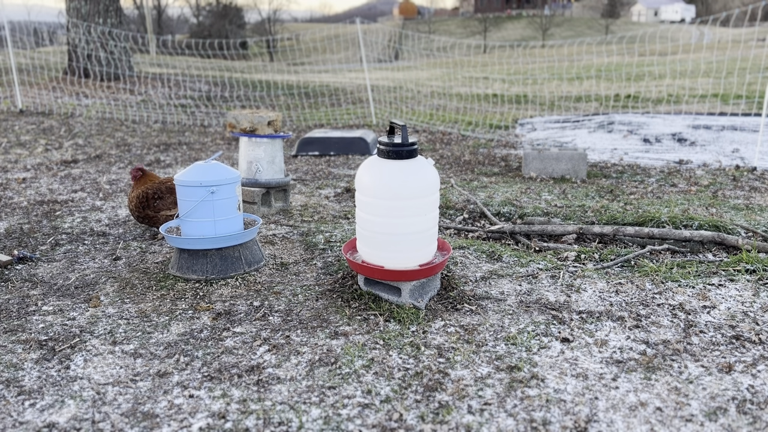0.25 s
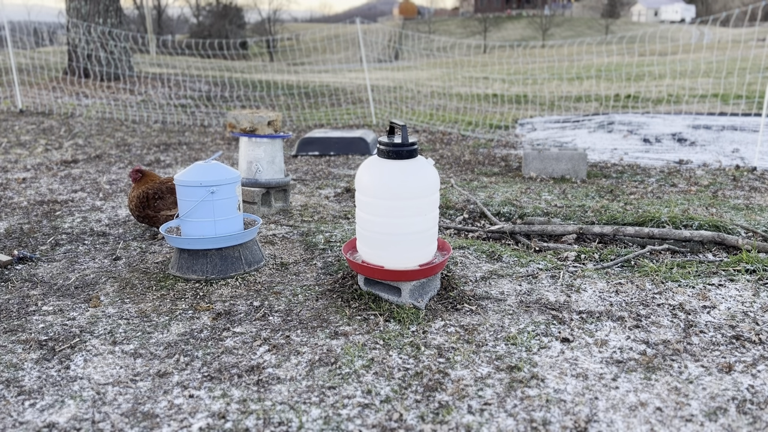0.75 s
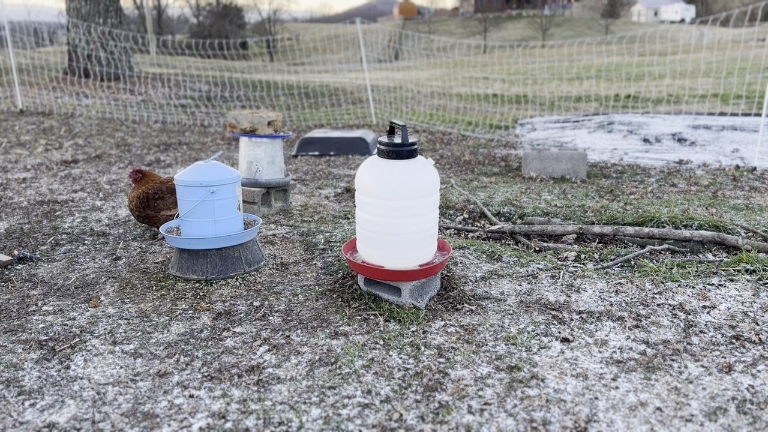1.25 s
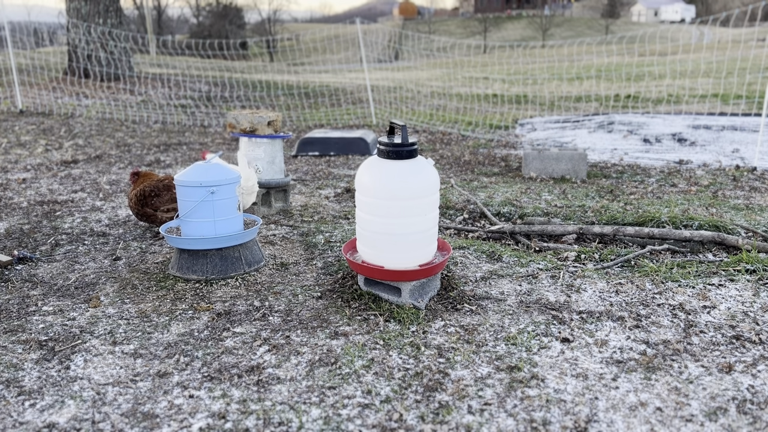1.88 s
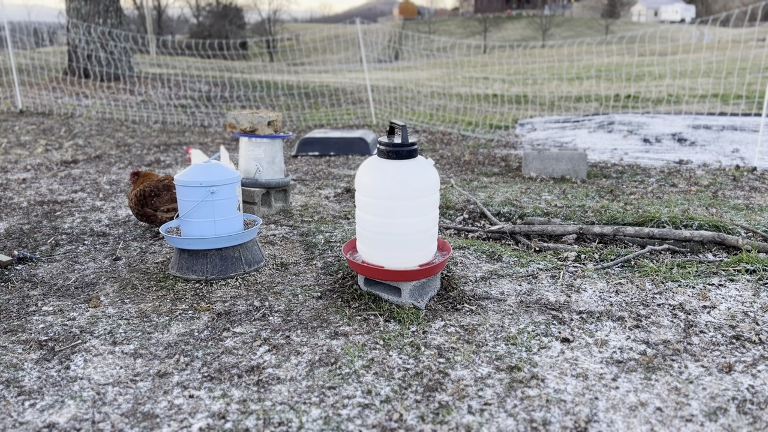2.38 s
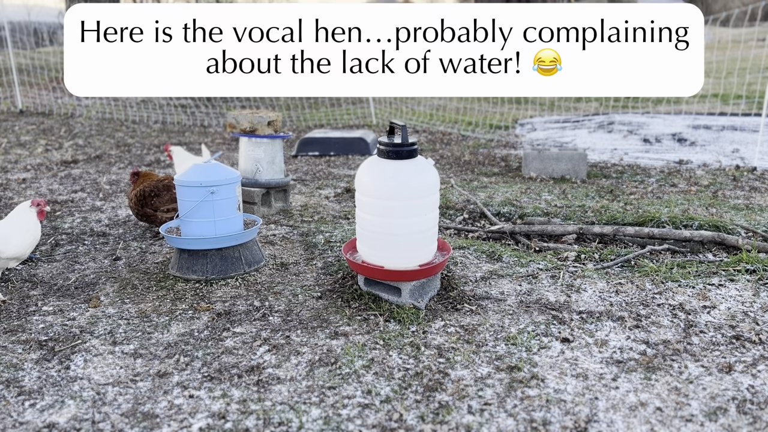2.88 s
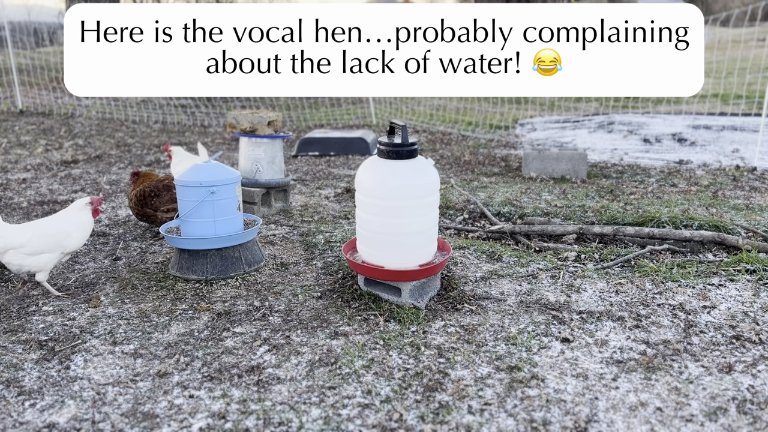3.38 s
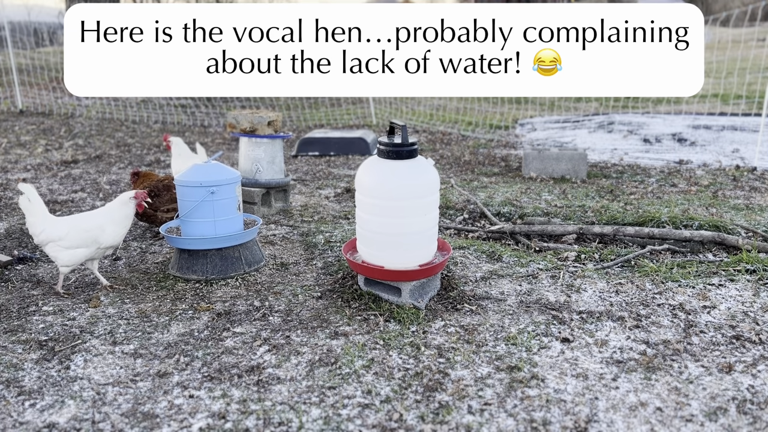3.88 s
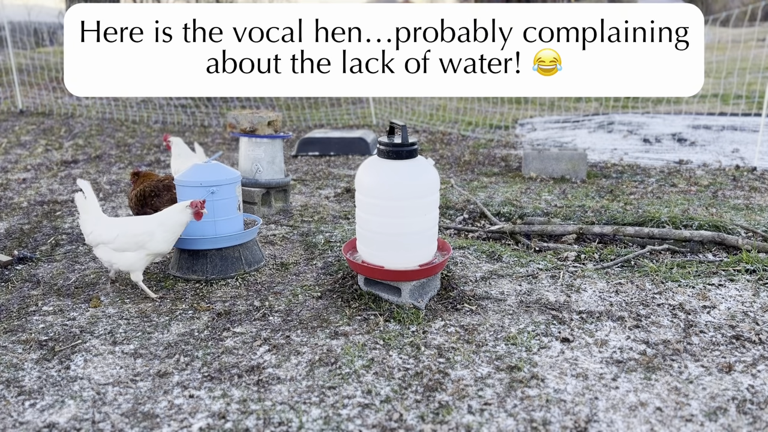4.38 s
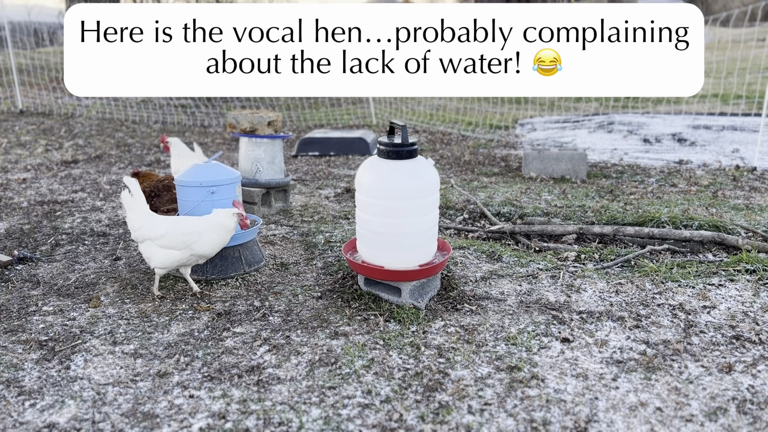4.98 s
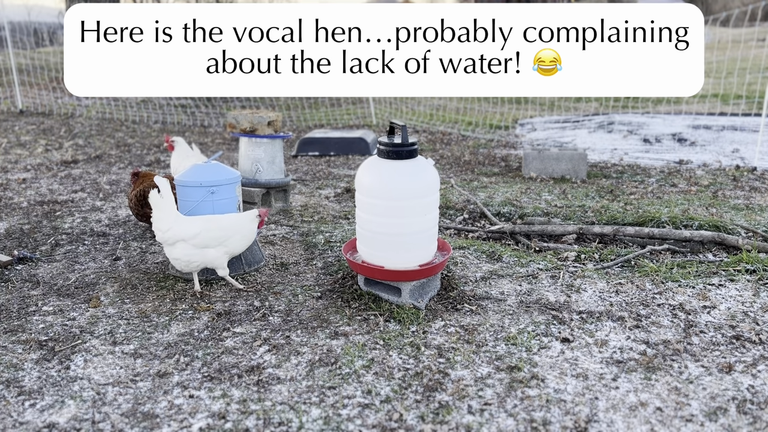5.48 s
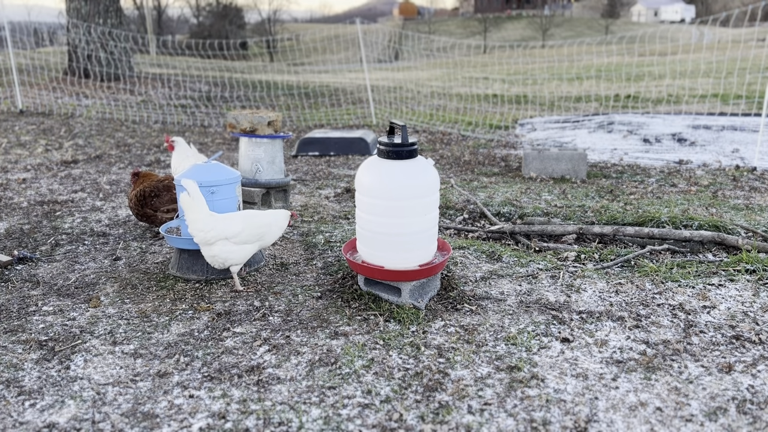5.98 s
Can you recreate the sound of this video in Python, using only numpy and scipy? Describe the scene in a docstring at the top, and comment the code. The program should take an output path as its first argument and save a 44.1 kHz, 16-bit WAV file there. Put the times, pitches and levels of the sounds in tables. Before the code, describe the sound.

In a quiet outdoor run, a hen's closed-beak moan leads to two raspy drawn-out squawks, then small ticks and a burst of rattling hollow thumps.

```python
"""Hen walking through an outdoor run

A hen walks in from the left: a closed-beak moan, then two long hoarse calls that flip between clear and
ragged pulse trains in moving throat resonances, with soft clucks of a few partials between. Small ticks are
noise puffs over thuds; a hollow body off to the left booms, snaps and rattles when knocked. Far rumble and
hiss are shaped noise. Two spaced microphone ports hear hen, ticks and knocks earlier on the left."""
import sys
import numpy as np
from scipy import signal
from scipy.fft import rfft, irfft, next_fast_len
from scipy.io import wavfile
from scipy.ndimage import uniform_filter1d, map_coordinates

SR = 44100
rng = np.random.default_rng(int(sys.argv[2]) if len(sys.argv) > 2 else 0)


def wrap_up_sound(samples):
    """Save the sound to the file named by the first command line argument, as 16-bit audio."""
    columns = np.atleast_2d(samples).T
    # keep every value between -1 and 1, then stretch to whole-number steps
    tamed = np.clip(columns, -1, 1)
    steps = np.round(tamed * 32767).astype(np.int16)
    wavfile.write(sys.argv[1], SR, steps)


N = 275184
T = np.arange(N) / SR  # s


def amp(db):
    """dB to gain."""
    return 10 ** (np.asarray(db) / 20)


def unit(x):
    """Scaled to rms 1."""
    return x / np.sqrt(np.mean(x ** 2) + 1e-20)


def along(points, hz):
    """Values of (Hz, value) points, read on a log frequency axis."""
    f, v = np.transpose(points)
    return np.interp(np.log(hz + 1), np.log(f + 1), v)


def wobble(rate):
    """A smooth random curve with rate knots a second."""
    return map_coordinates(rng.standard_normal(int(N * rate / SR) + 4), [T * rate])


def filtered(x, response):
    """x filtered by a response that is a function of frequency in Hz."""
    m = next_fast_len(N + SR // 2)
    return irfft(rfft(x, m) * response(np.fft.rfftfreq(m, 1 / SR)), m)[..., :N]


def from_left(x, lag_ms):
    """The right port hears it later (lag steady or moving) and shaded; the upper treble sits nearer the middle."""
    # left minus right, from the shading by the recorder's body: (f/Hz, level/dB)
    shade = [(200, 0), (380, 1.5), (700, 6.5), (1150, 6), (1600, .5), (2200, .5), (3000, 2.5), (4500, 1),
             (6500, 4), (8500, 0)]
    side = np.array([1, -1])[:, None, None] / 2
    f, t, z = signal.stft(x, SR, nperseg=512)
    f = f[:, None]
    lag_s = np.interp(t, T, lag_ms + 0 * T) / 1000
    centred = .62 / (1 + (5600 / (f + 1)) ** 6)
    delay = np.exp(2j * np.pi * f * side * lag_s)
    ports = amp(side * along(shade, f)) * (centred + (1 - centred) * delay)
    return signal.istft(z * ports, SR, nperseg=512)[1][:, :N]


def yard():
    """Far rumble, shared by both ports in the lows and separate higher up, under an uneven stereo hiss."""
    # rumble level: (t/s, level/dB)
    rumble_level = [(0, -68.5), (3.8, -61.5), (4.8, -65.5), (6.24, -65)]
    # relative rumble and hiss spectra: (f/Hz, level/dB per Hz)
    rumble_colour = [(20, -37), (32, -26), (50, 2), (120, -2.5), (230, -11.5), (400, -15), (700, -33.5),
                     (1000, -49.5)]
    hiss_colour = [(1000, 0.5), (1600, -5.5), (2050, 3), (2800, -6.5), (5000, -10.5), (6400, 5.5),
                   (7300, 0), (8800, -27.5), (14000, -38)]
    # hiss, left minus right: (f/Hz, level/dB)
    hiss_left = [(700, 2), (4400, 6.5), (8000, 28), (11000, -16)]
    shared, own = rng.standard_normal(N), rng.standard_normal((2, N))
    own_share = lambda f: np.clip(f / 450, .1, 1)
    colour = lambda f: amp(along(rumble_colour, f))
    common = filtered(shared, lambda f: colour(f) * np.sqrt(1 - own_share(f) ** 2))
    separate = filtered(own, lambda f: colour(f) * own_share(f))
    level_db = np.interp(T, *np.transpose(rumble_level)) + 1.5 * wobble(7)
    rumble = unit(common + separate) * amp(level_db)
    side = np.array([[0], [-1]])
    hiss = filtered(rng.standard_normal((2, N)),
                    lambda f: amp(along(hiss_colour, f) + side * along(hiss_left, f)))
    return rumble + amp(-78.5) * unit(hiss)


def pulses(hz, size):
    """One band-limited pulse each time the phase passes a whole cycle, as from a beating syrinx."""
    phase = np.cumsum(hz) / SR
    at = np.interp(np.arange(1, int(phase[-1])), phase, np.arange(N))
    taps = at.astype(int)[:, None] + np.arange(-7, 9)
    offset = taps - at[:, None]
    shape = np.sinc(offset) * np.cos(offset * np.pi / 16) ** 2
    weights = shape * size[at.astype(int), None]
    return np.bincount(np.clip(taps, 0, N - 1).ravel(), weights.ravel(), N)


def tube(modes, f, width_hz):
    """Steep resonances, wider in the treble; low ones merge, alternate signs leave valleys between high ones."""
    merge_below_hz = 1950
    peak = lambda c, w: (1j * f * w / (c * c - f * f + 1j * f * w)) ** 2
    peaks = [(c, amp(db) * peak(c, width_hz + .06 * c)) for c, db in modes]
    low = sum(abs(h) for c, h in peaks if c <= merge_below_hz)
    high = [h for c, h in peaks if c > merge_below_hz]
    return low + sum((-1) ** k * h for k, h in enumerate(high))


def call(rows, throats, opens_s, brighten_db, steadiness, flutter_hz, catch_db, width_hz, jitter,
         clump_db, clumps, tilt_hz, tone_db, lag_ms):
    """A steady soft pulse train and a chaotic sharp one trade places in a throat moved by beak and neck.

    Pairs run from beak closed to beak open."""
    # moments when the syrinx settles into a clear tone: (from/s, to/s)
    clear_moments = [(1.0, 1.23), (1.478, 1.505), (1.572, 1.608), (1.624, 1.638), (1.666, 1.704),
                     (1.72, 1.734), (1.756, 1.782), (1.84, 1.97), (3.74, 3.82)]
    clear_share = .93
    attack_s, release_db_per_s, sag_hz_per_s = .004, 748, 400
    opening_s, open_db = .019, 5  # the beak opens late in a long call and the sound gains
    saturation = .4  # exponent; the airflow caps the swing, so bursts even out

    # fast start; past the last row the call dies away and its pitch sags
    s, db, hz, neck = np.transpose(rows)
    after = np.clip(T - s[-1], 0, .08)
    pitch = np.interp(T, s, hz) - sag_hz_per_s * after
    opening = np.clip((T - opens_s) / opening_s, 0, 1)
    level = amp(np.interp(T, s, db) + open_db * opening - release_db_per_s * after)
    level = level * np.clip((T - s[0]) / attack_s, 0, 1)

    # three excitations
    steady = pulses(pitch * (1 + .011 * wobble(45)), amp(1.5 * wobble(60)))
    ragged_size = amp(clump_db * wobble(clumps) + 2.5 * wobble(900))
    ragged = pulses(pitch * np.exp(jitter * wobble(220)), ragged_size)
    breath = unit(rng.standard_normal(N) * amp(clump_db * wobble(clumps)))
    span = slice(int(s[0] * SR), int((s[-1] + .08) * SR))
    sources = np.array([unit(steady), unit(ragged), breath])[:, span]
    f, t, (tone, rasp, air) = signal.stft(sources, SR, nperseg=512, noverlap=448)
    f, t = f[:, None], t + s[0]
    airy = .03 + .5 * f / (f + 3000)
    rasp = np.sqrt(1 - airy) * rasp + np.sqrt(airy) * air  # turbulence gains on the pulses in the treble

    # the neck trembles, so the low resonances waver; the treble follows mostly the slow posture
    beak, stretch = np.interp(t, T, opening), np.interp(t, s, neck)
    treble_db = brighten_db * (stretch - 1) * 100
    posture = uniform_filter1d(stretch, size=120, mode="nearest")
    trembling = stretch * (1 + .03 * np.interp(t, T, wobble(35)))
    stretch = posture + (trembling - posture) / (1 + (f / 2500) ** 2)
    narrow, wide = (tube(modes, f / stretch, width_hz) for modes in throats)
    # random patches of the call's treble swell and fade
    patches = uniform_filter1d(rng.standard_normal(tone.shape), size=7, axis=0)
    patches = unit(uniform_filter1d(patches, size=45))
    treble_gain = amp((treble_db + 5 * patches) * f / (f + 2500))
    throat = ((1 - beak) * narrow + beak * wide) * treble_gain
    soft = throat * ((1 + 1j * f / 2000) / (1 + 1j * f / tilt_hz)) ** 2

    # clear tone against rasp
    settled_now = clear_share * sum((t > a) & (t < b) for a, b in clear_moments)
    least_clear = np.interp(beak, [0, 1], steadiness) * amp(5 * np.interp(t, T, wobble(30)))
    clear = np.clip(settled_now, least_clear, 1)
    settled = clear / (1 + (f / 6000) ** 4)  # the treble stays breathy even in clear moments
    power = lambda h: np.sqrt(np.mean(abs(h) ** 2, axis=0))
    clear_part = amp(tone_db) * np.sqrt(clear) * tone * soft / power(soft)
    ragged_part = np.sqrt(1 - settled) * rasp * throat / power(throat)
    sound = signal.istft(clear_part + ragged_part, SR, nperseg=512, noverlap=448)[1]
    swing = uniform_filter1d(abs(signal.hilbert(sound)), size=130)
    sound = unit(sound / (swing + .2) ** saturation)
    voice = np.zeros(N)
    voice[span] = sound[:span.stop - span.start]

    # the ragged voice flutters: it catches briefly at an uneven beat, to a depth set by the beak
    beat = np.cos(2 * np.pi * np.cumsum(flutter_hz * np.exp(.25 * wobble(40))) / SR)
    depth_db = np.clip(.7 + .4 * wobble(60), 0, 1.3) * np.interp(opening, [0, 1], catch_db)
    caught_db = np.clip(beat, 0, 1) ** 2 * depth_db * (1 - np.interp(T, t, clear))
    return from_left(voice * level * amp(-caught_db), lag_ms)


def hen():
    """She comes nearer the middle, so the lag between the ports shrinks from call to call."""
    # the calls: (t/s, level/dB before the beak opens, pitch f/Hz, stretch of the throat resonances/factor)
    moan_rows = [(0, -54.5, 695.7, 0.896), (.95, -54, 707, 0.924), (1.2, -58.5, 789, 1),
                 (1.42, -59, 795, 1.28)]
    first_rows = [(1.433, -41.5, 405.4, 1.08), (1.58, -44.5, 384.4, 0.93), (1.64, -42, 412, 0.98),
                  (1.69, -44.5, 372.2, 1.2), (1.73, -43, 413.8, 0.8), (1.79, -44, 384, 1),
                  (1.96, -44, 399.2, 1.09), (1.975, -44, 589.6, 1.037), (2.12, -42.5, 520, 0.932),
                  (2.24, -43.5, 610.3, 1.087), (2.29, -45.5, 599.3, 0.98)]
    second_rows = [(2.748, -57, 339.7, 0.84), (2.776, -50, 341.4, 0.84), (2.79, -57.5, 341.5, 0.82),
                   (2.865, -52, 348.3, 0.87), (3.25, -43, 392.1, 0.97), (3.7, -39, 431.8, 1.078),
                   (3.82, -42.5, 473.8, 0.97), (3.84, -39, 546.5, 1), (3.9, -36.5, 521.5, 0.96),
                   (4.02, -39, 514.4, 1.024), (4.08, -34, 554, 0.99), (4.145, -35.5, 487.7, 0.95)]
    # throat resonances in five postures: (f/Hz, level/dB)
    shut = [(450, 5), (700, 18), (1150, -11)]
    low = [(780, 4), (1230, 7), (2030, -3), (2420, -6.5), (3350, -10.5), (4500, -7.5), (8000, -24),
           (9600, -25), (12400, -28), (14500, -33)]
    stretched = [(550, -12), (1200, 5.5), (2250, -20.5), (3200, -12.5), (4700, -9), (6000, -39),
                 (7300, -22.5), (8900, -21), (11900, -27), (14500, -33)]
    parted = [(380, -9), (750, 0), (1280, 10), (1750, -5), (2400, -5.5), (3450, -6.5), (4700, -13),
              (6450, -4), (8100, -19.5), (9700, -31), (13900, -36)]
    wide_open = [(550, -13), (1050, -11.5), (1550, 12), (1850, -14), (2350, -11), (3050, -10.5),
                 (4300, -2.5), (6400, -8), (8600, -21), (14900, -34.5)]
    # lag between the ports as she walks during the last call: (t/s, lag/ms)
    walk = [(2.9, .245), (3.4, .185), (4.1, .175)]
    # brighten_db is treble per percent of stretch
    moan = call(moan_rows, (shut, shut), opens_s=np.inf, brighten_db=0, steadiness=(.12, .12),
                flutter_hz=60, catch_db=(19, 19), width_hz=160, jitter=.13, clump_db=2.5, clumps=45,
                tilt_hz=900, tone_db=0, lag_ms=.48)
    first = call(first_rows, (low, stretched), opens_s=1.955, brighten_db=0, steadiness=(.05, .04),
                 flutter_hz=70, catch_db=(8, 14), width_hz=190, jitter=.14, clump_db=2, clumps=170,
                 tilt_hz=500, tone_db=-2, lag_ms=.29)
    second = call(second_rows, (parted, wide_open), opens_s=3.765, brighten_db=.5, steadiness=(.11, .05),
                  flutter_hz=95, catch_db=(9, 13), width_hz=190, jitter=.13, clump_db=2, clumps=200,
                  tilt_hz=1100, tone_db=-2, lag_ms=np.interp(T, *np.transpose(walk)))
    return moan + first + second


def clucks():
    """Short rounded notes, mostly two partials, a little hoarse from random phase drift."""
    # soft clucks: (t/s, length/s, pitch f/Hz, level/dB, second partial over the first/dB)
    notes = [(0.249, 0.094, 209, -74.5, 12.5), (0.497, 0.11, 220, -83.5, 21),
             (1.247, 0.047, 234, -59, -4.5), (1.369, 0.041, 252, -57, -1), (2.528, 0.05, 271.6, -65, 8),
             (2.641, 0.051, 234.5, -63.5, 2.5), (2.701, 0.048, 230, -61.5, 7),
             (4.462, 0.1, 378.7, -70, 0.5), (5.116, 0.027, 273.9, -63.5, 6),
             (5.843, 0.034, 246.7, -61.5, 9)]
    out = np.zeros(N)
    for s, length, hz, db, second_db in notes:
        t = np.arange(int(length * SR)) / SR
        turn = 2 * np.pi * hz * t + np.cumsum(rng.normal(0, .03, len(t)))
        upper = np.sin(2 * turn) + amp(-17) * np.sin(3 * turn) + amp(-24) * np.sin(4 * turn)
        note = np.sin(turn) + amp(second_db) * upper
        swell = np.sin(np.pi * (t / length) ** .53)
        out[round(s * SR):][:len(t)] += amp(db) * note * swell
    return from_left(out, lag_ms=.29)


def ticks():
    """Small pecks and footfalls: a bright puff over a short thud; soft rustles of much the same colour."""
    # ticks: (t/s, level/dB, t60/s held within .01 to .3, thud over the tick/dB, lowest resonance f/Hz)
    pecks = [(0.681, -69.5, 0.14, 2, 2180), (1.44, -57, 0.23, -4, 2020), (2.71, -64, 0.0059, 25, 2100),
             (4.913, -64, 0.35, -4, 2070), (5.149, -54, 0.058, 5.5, 2930)]
    # faint soft rustles: (middle t/s, half length/s, level/dB)
    rustle_rows = [(4.404, 0.21, -74)]
    out, t, noise = np.zeros(N + SR), np.arange(SR // 4) / SR, rng.standard_normal(N)

    def grit(hz):
        """Noise through three resonances, the lowest one given."""
        modes = [(hz, 0), (2.05 * hz, -6), (3.4 * hz, -15)]
        return unit(filtered(noise, lambda f: tube(modes, f, width_hz=1100)))

    for s, db, t60, thud_db, hz in pecks:
        i = round(s * SR)
        thud = amp(thud_db - 60 * t / .016) * np.sin(2 * np.pi * 170 * t)
        puff = grit(hz)[i:][:len(t)] * amp(-60 * t / np.clip(t60, .01, .3))
        out[i:][:len(t)] += amp(db) * (puff + thud)
    rustle_level = sum(amp(db) * np.exp(-((T - s) / half) ** 2) for s, half, db in rustle_rows)
    return from_left(out[:N] + grit(1840) * rustle_level, lag_ms=.46)


def knocks():
    """Each blow booms in a hollow body, snaps in the treble and sets loose parts rattling."""
    # blows on the hollow body: (t/s, boom level/dB, rattle t60/s)
    blows = [(5.286, -38.5, 1), (5.359, -36, 0.47), (5.449, -45, 0.55), (5.551, -51, 0.25),
             (5.89, -38, 0.38)]
    # resonances of the body, before a random spread per blow: (f/Hz, level/dB, t60/s)
    hollow = [(75.2, -5, 0.35), (174, 4, 0.16), (194.7, 0.5, 0.24), (236.6, -16.5, 0.6), (370.3, -13, 0.3)]
    # colour of the rattle: (f/Hz, level/dB)
    rattle_colour = [(300, -0.5), (600, -1.5), (900, -13), (1400, 0.5), (2100, -5), (3000, -11),
                     (4500, -15.5), (11000, -23), (16000, -48)]
    boom_late_s = .00687  # the body takes a moment to swing up
    rattle_db, crack_db = -13, -22  # against the boom
    crack_lasts, crack_hz = .26, 11500  # snap's decay as a share of the rattle's; its low cut
    boom, loose, snap = np.zeros(N + SR), np.zeros(N + SR), np.zeros(N + SR)
    t = np.arange(SR // 2) / SR
    for s, db, t60 in blows:
        i = round(s * SR)
        spread_db = rng.normal(0, 2.4, len(hollow))
        ring = sum(amp(level + d - 60 * t / decay) * np.sin(2 * np.pi * hz * t)
                   for d, (hz, level, decay) in zip(spread_db, hollow))
        boom[round((s + boom_late_s) * SR):][:len(t)] += amp(db) * ring * (1 - np.exp(-t / .0062))
        rattling = amp(-60 * t / t60) * (1 - np.exp(-t / .0052))
        first_hit = 3.1 * amp(-60 * t / .012)
        loose[i:][:len(t)] += amp(db + rattle_db) * (rattling + first_hit)
        snap[i:][:len(t)] += amp(db + crack_db - 60 * t / (crack_lasts * t60))
    uneven = rng.standard_normal(N) * amp(1.4 * wobble(150))
    shiver = unit(filtered(uneven, lambda f: amp(along(rattle_colour, f))))
    fizz = unit(filtered(rng.standard_normal(N), lambda f: 1 / (1 + (crack_hz / (f + 1)) ** 4)))
    return from_left(boom[:N] + loose[:N] * shiver + snap[:N] * fizz, lag_ms=.467)


def echoes(x):
    """Ground, fence and far walls answer as a noise tail; each frequency dies at its own speed."""
    # echo decay: (f/Hz, t60/s)
    echo_decay = [(200, .12), (8000, .08)]
    hz, t, z = signal.stft(rng.standard_normal((2, SR // 2)), SR, nperseg=256)
    fade = amp(-60 * t / along(echo_decay, hz)[:, None])
    tail = signal.istft(z * fade, SR, nperseg=256)[1]
    late = np.pad(x, ((0, 0), (300, 0)))  # samples before the first echo
    return signal.fftconvolve(late, tail / np.linalg.norm(tail[0]), axes=1)[:, :N]


def scene():
    """All near sources, their echoes and the yard."""
    near = hen() + clucks() + ticks() + knocks()
    return near + amp(-24) * echoes(near) + yard()


def record(dry):
    """Overall colour: a narrow dip near 11.6 kHz, nothing above 15.75 kHz."""
    # overall colour: (f/Hz, level/dB)
    overall_colour = [(10000, 4.5), (11600, -15.5), (13000, 4)]
    top_hz = 15750
    return filtered(dry, lambda hz: amp(along(overall_colour, hz)) * (hz < top_hz))


dry = scene()
out = record(dry)
wrap_up_sound(out)
```